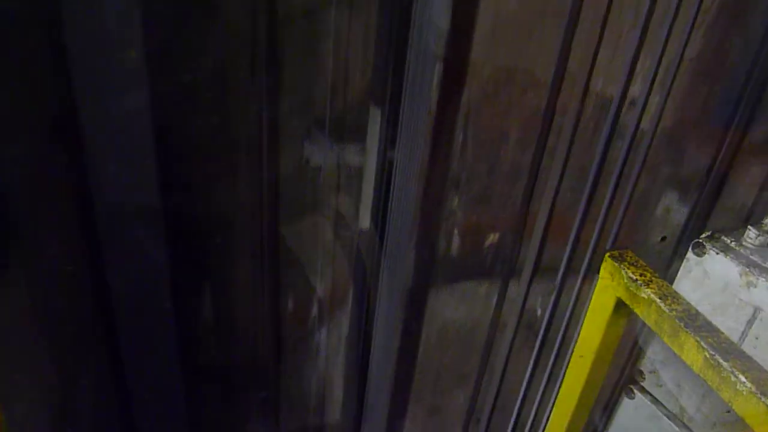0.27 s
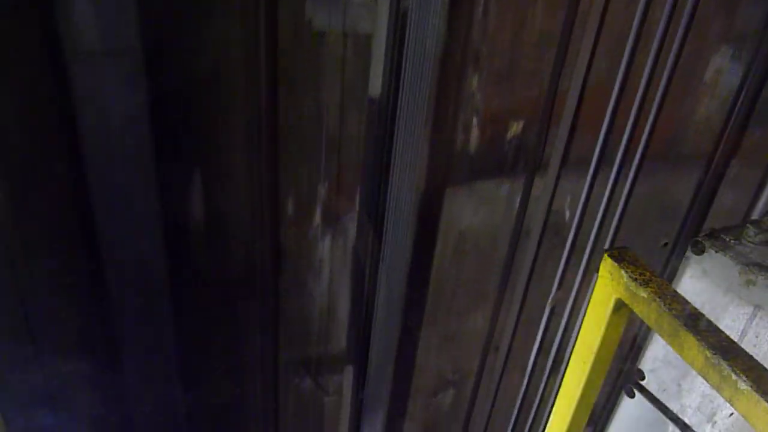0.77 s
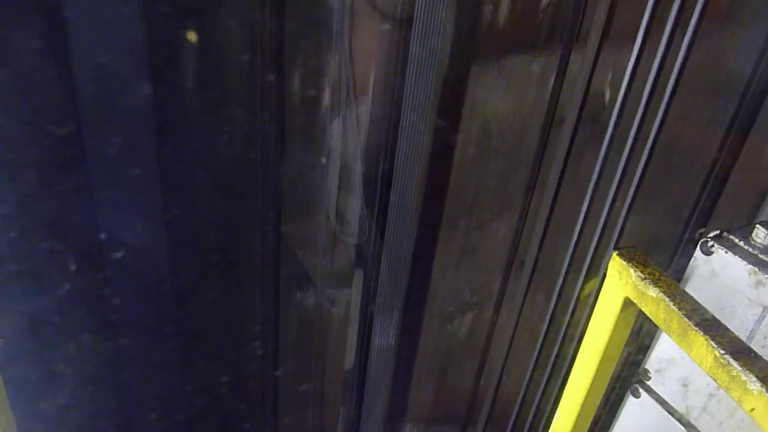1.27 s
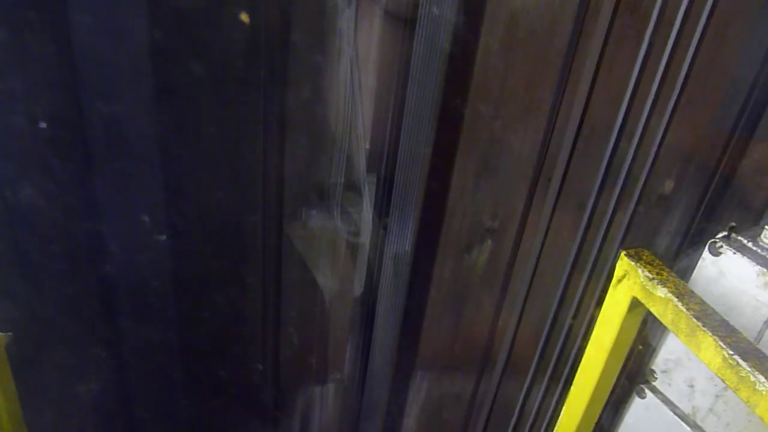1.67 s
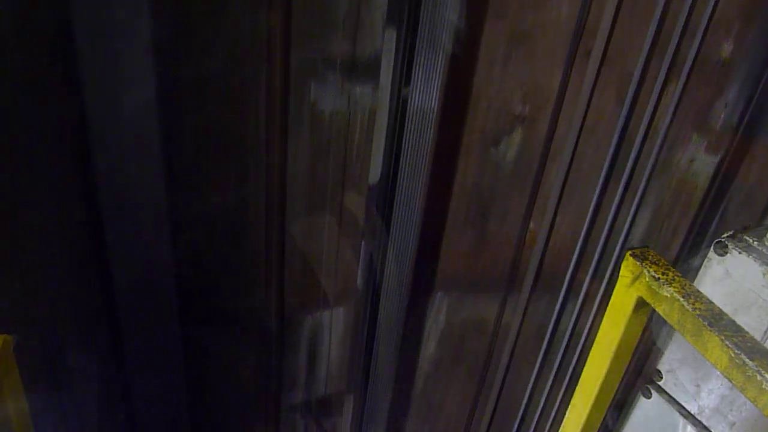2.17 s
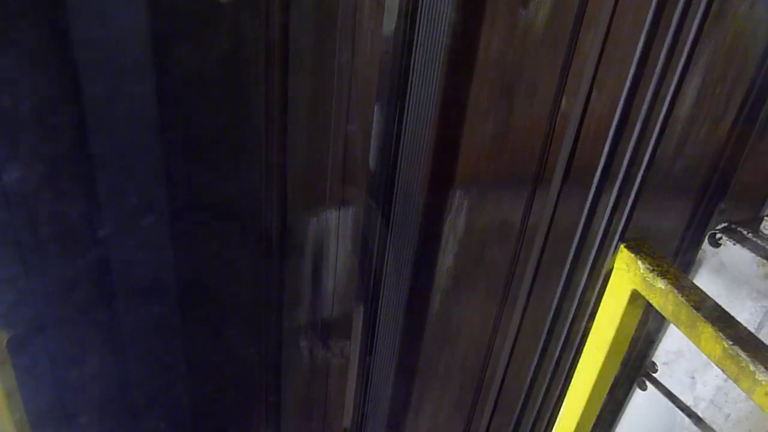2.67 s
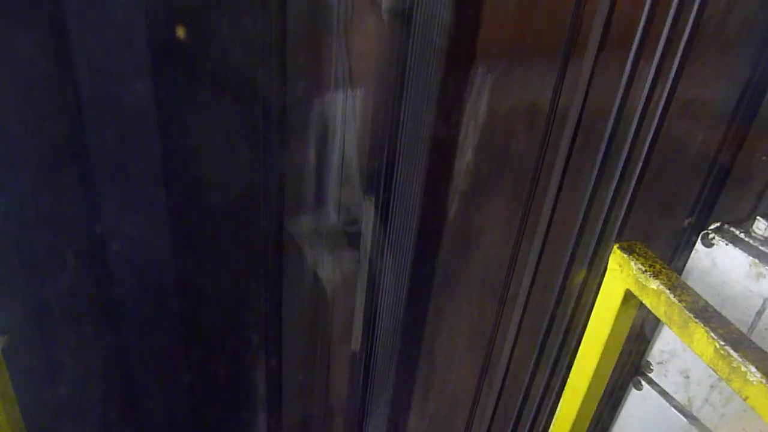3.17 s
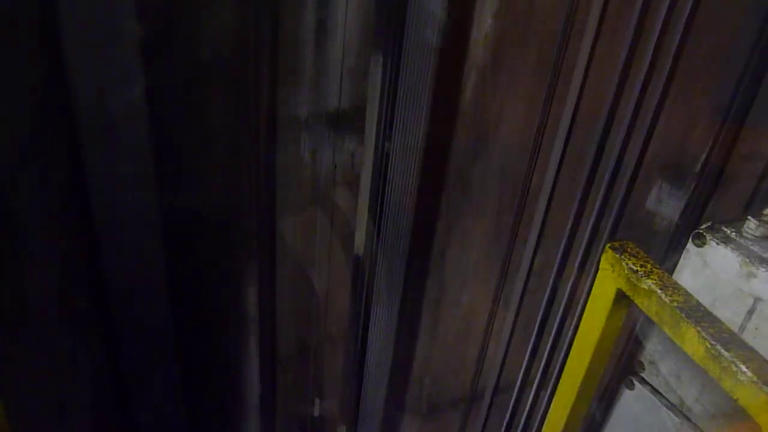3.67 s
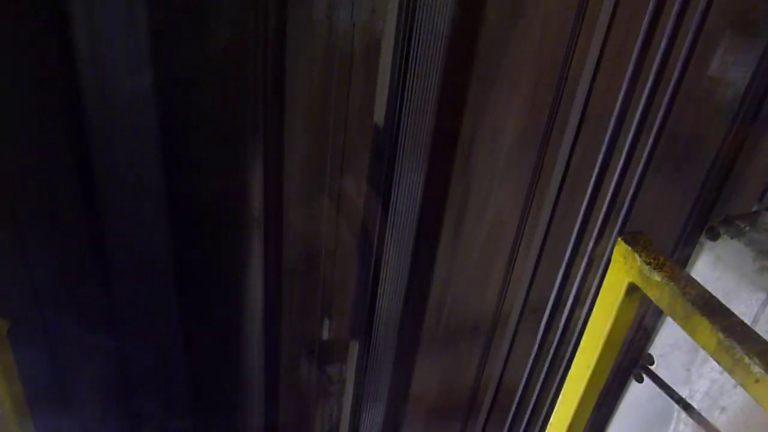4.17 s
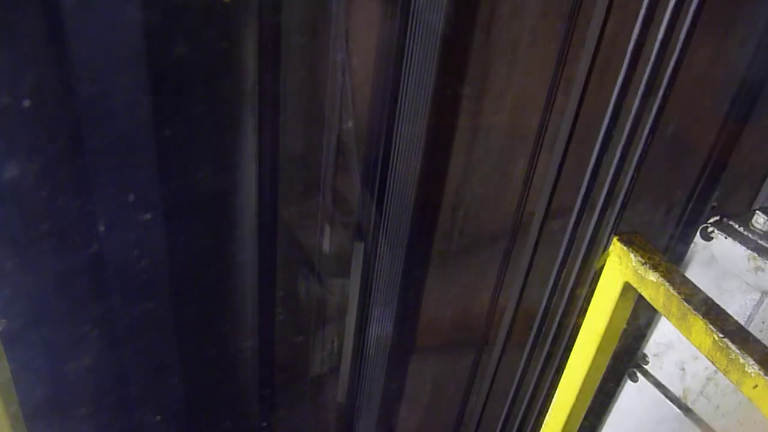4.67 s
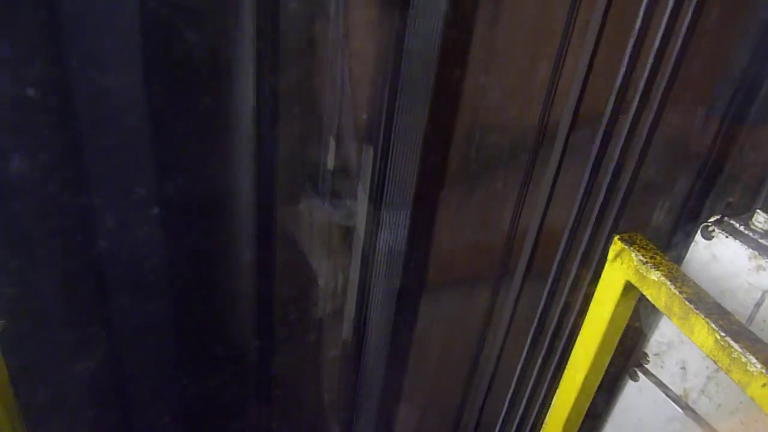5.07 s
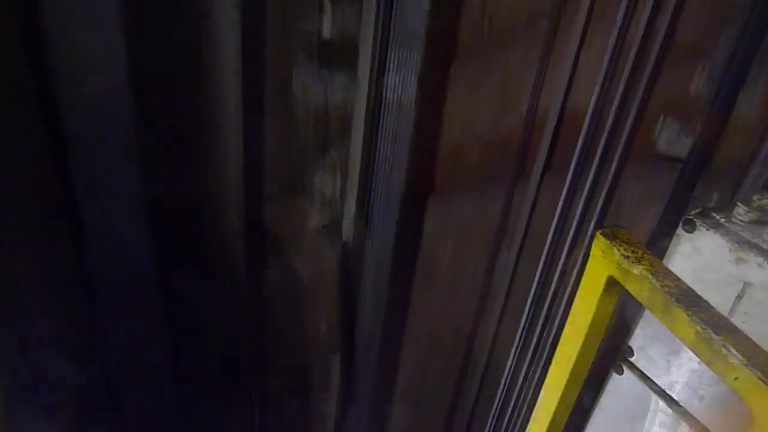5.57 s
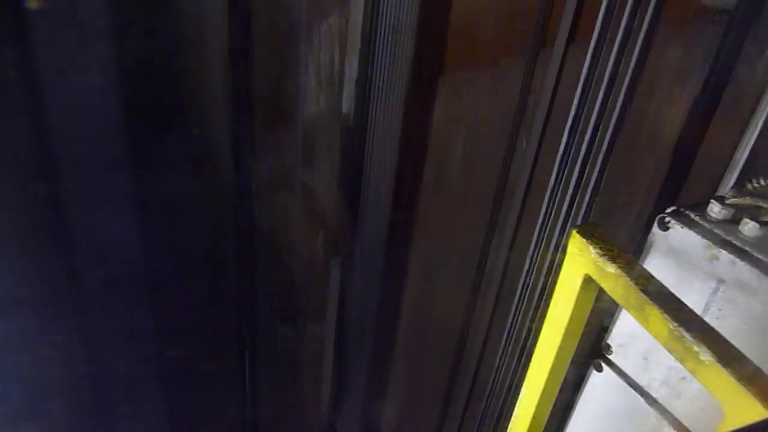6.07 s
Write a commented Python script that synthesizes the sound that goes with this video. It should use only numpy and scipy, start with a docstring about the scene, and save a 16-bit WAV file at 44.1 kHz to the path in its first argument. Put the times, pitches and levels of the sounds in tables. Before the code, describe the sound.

From the roof of a travelling lift car, a broad, hollow roar of guide rollers and ropes runs without a break and grows slightly. The metal frame rings blurrily inside it and the concrete shaft booms underneath. A wavering hum comes and goes, air hisses softly, a faint high whine hovers, and a few tiny rail scuffs pass. Close stereo microphones, dull on top.

```python
"""A broad roar is loudest throughout: guide rollers and ropes rumble around a microphone pair on a lift car's roof.
Its shaking, made as coloured noise, rings the car frame and booms in the cross modes of the concrete duct.
Close by, air hisses past as brighter noise and the motor drive whines as narrow noise bands;
a hum made of two wavering sines rises and sinks, and a few light scuffs of grainy hiss pass by."""
import sys
import numpy as np
from scipy import signal
from scipy.fft import rfft, irfft
from scipy.io import wavfile
from scipy.ndimage import uniform_filter1d, map_coordinates

SR = 44100
rng = np.random.default_rng(int(sys.argv[2]) if len(sys.argv) > 2 else 0)


def dump_mix(stems):
    """Bounce the given channels to the path in sys.argv[1] as a 16-bit WAV at rate SR."""
    frames = np.atleast_2d(stems).T  # one column per channel
    limited = np.clip(frames, -1, 1)  # hard clip at full scale
    pcm = np.round(limited * 32767).astype(np.int16)
    wavfile.write(sys.argv[1], SR, pcm)


N = 279153
T = np.arange(N) / SR  # s
HZ = np.arange(N // 2 + 1) * SR / N  # frequency of each spectrum bin

# Colour tables set relative levels only: field() brings every noise to mid rms 1.
# Colour of the roller and rope roar. Each row: frequency in Hz, relative density in dB per Hz.
RUMBLE_COLOUR = [(30, -70), (45, -56), (65, -46.5), (115, -39.5), (200, -15.5), (315, -15.5), (345, -6),
                 (485, -4.5), (600, -3), (690, -5.5), (810, -3.5), (1120, -12.5), (1800, -27.5),
                 (3000, -42.5), (5000, -84.5)]
# Colour of the passing air. Each row: frequency in Hz, relative density in dB per Hz.
RUSH_COLOUR = [(700, -20), (1500, 10), (2200, 3.5), (2700, 1), (4000, -3.5), (5500, -6.5), (6800, -10),
               (7400, -16), (7800, -30), (7950, -66)]
# Colour of the rail scuffs. Each row: frequency in Hz, relative density in dB per Hz.
SCUFF_COLOUR = [(2500, -20), (4600, -8), (5500, 0), (7300, -2), (7900, -15), (8600, -24)]
# Two close capsules in a diffuse field. Each row: frequency in Hz, side minus mid in dB.
STEREO_WIDTH = [(60, -31.5), (180, -32.5), (310, -34.5), (530, -22.5), (900, -16), (1200, -11.5),
                (1550, -5.5), (2100, -7), (3200, -2), (4600, -1), (7000, -10), (7800, -18.5)]

# Cross modes of the concrete duct. Each row: frequency in Hz, width in Hz, relative level in dB.
DUCT_MODES = [(76, 8.6, -19.5), (125.2, 14, -16), (145.8, 17, -12.5), (224, 18, -2.5), (250.4, 20, -1),
              (288, 25, -2)]
# Rings of the car frame. Each row: frequency in Hz, width in Hz, relative level in dB.
FRAME_MODES = [(350, 16, -3), (383, 12, -3), (420, 20, -5), (449, 22, 0), (594, 12, 5), (618, 20, -2),
               (652, 12, 2), (667, 10, 2), (700, 14, -1), (738, 30, -5), (1330, 30, -13)]
# Broad rings in the middle of the roar. Each row: frequency in Hz, width in Hz, relative level in dB.
DRONE_MODES = [(522, 36, -7), (556, 34, 0)]
# Rings at the upper edge of the roar. Each row: frequency in Hz, width in Hz, relative level in dB.
EDGE_MODES = [(756, 14, -2), (781, 12, 2), (810, 10, 1.5), (832, 14, -1), (862, 16, -3)]
# Strands of the drive's whine. Each row: frequency in Hz, width in Hz, relative level in dB.
WHINE_STRANDS = [(6215, 18, -5), (6245, 30, -6), (6270, 18, -4), (6287, 16, 0), (6312, 16, -2),
                 (6337, 20, -11), (6280, 150, -15)]
# Noisy haze around the hum. Each row: frequency in Hz, width in Hz, relative level in dB.
HUM_HAZE = [(334, 6, 0)]

# Level of the drone along the ride. Each row: time in seconds, level in dB.
DRONE_LEVEL = [(0, -38), (.92, -41), (1.05, -33), (1.35, -33), (1.7, -37), (3.2, -38), (4.0, -36),
               (4.6, -37), (4.8, -32.5), (6.33, -34.5)]
# Level of the upper-edge rings along the ride. Each row: time in seconds, level in dB.
EDGE_LEVEL = [(0, -44.5), (.6, -39.5), (1.3, -42.5), (2.4, -37), (3.4, -39), (3.95, -33.5), (4.4, -46),
              (5.3, -35.5), (6.33, -37)]
# Level of the rush along the ride. Each row: time in seconds, level in dB.
RUSH_LEVEL = [(0, -45), (.85, -46), (1.2, -44), (1.7, -45.5), (5.0, -44), (6.33, -43)]
# Level of the whine along the ride. Each row: time in seconds, level in dB.
WHINE_LEVEL = [(0, -54), (1.2, -51.5), (2.2, -52.5), (3.0, -51.5), (3.7, -53), (4.8, -50.5), (5.6, -53),
               (6.33, -51.5)]
# Level of the hum along the ride. Each row: time in seconds, level in dB.
HUM_LEVEL = [(0, -45), (.22, -45), (.33, -37), (.78, -37), (.96, -50), (1.15, -38), (1.5, -37), (1.76, -45),
             (1.95, -37), (2.3, -47), (2.9, -41), (3.2, -38), (3.75, -41), (4.17, -34), (4.42, -45),
             (5.12, -46), (5.5, -38), (5.85, -46), (6.1, -39), (6.33, -45)]
# Rubs on the guide rail. Each row: start in seconds, level in dB, time in contact in seconds.
SCUFFS = [(0.866, -53.5, .03), (.9, -56, .02), (1.77, -66, .02), (2.19, -63, .035), (6.18, -61, .05)]

# Levels at the start (dB) and their steady growth along the shaft (dB per s)
RUMBLE_DB, RUMBLE_GROWTH_DB_S = -30, 0.5
FRAME_DB, FRAME_GROWTH_DB_S = -35, 0.5
BOOM_DB, BOOM_GROWTH_DB_S = -41.5, 0.05

TRAIL = 2.6  # upper skirt over lower skirt: duct modes and hum haze set in sharply, trail off upwards
WHINE_SIDE_DB = -10  # side against mid
HUM_HZ = 330.5  # lowest pitch
SCUFF_T60_S = 0.089
LEFT_LAG_S, LEFT_DB = 1.5e-5, -.1  # left capsule is later and softer: sound comes slightly from the right
LOW_CUT_HZ, TOP_HZ = 42, 8500


def undb(db):
    """Amplitude factor of a level in dB."""
    return 10 ** (np.asarray(db) / 20)


def swell(points):
    """Gain over time through (s, dB) points."""
    s, db = np.transpose(points)
    return undb(np.interp(T, s, db))


def gain_of_points(points):
    """Gain of (Hz, dB) points joined on a log-frequency axis."""
    hz, db = np.transpose(points)
    return undb(np.interp(np.log(HZ + 1), np.log(hz), db))


def gain_of_modes(modes, order=2, trail=0.95):
    """Gain of resonances driven by unrelated shaking: their powers add."""
    power = 0
    for hz, width, db in modes:
        skirt = np.where(HZ > hz, trail * width, width)
        detune = (HZ - hz) * 2 / skirt
        power = power + undb(2 * db) / (1 + detune ** 2) ** order
    return np.sqrt(power)


def field(gain, side_gain):
    """Left and right noise of a given colour, mid rms 1; the side part is unrelated noise."""
    mid = rfft(rng.standard_normal(N)) * gain
    side = rfft(rng.standard_normal(N)) * gain * side_gain
    lag = np.exp(-2j * np.pi * HZ * LEFT_LAG_S)
    left = irfft((mid + side) * lag, N) * undb(LEFT_DB)
    right = irfft(mid - side, N)
    return np.array([left, right]) / np.std(irfft(mid, N))


def diffuse(gain):
    """Noise of a given colour as the close capsules hear it in a diffuse field."""
    return field(gain, gain_of_points(STEREO_WIDTH))


def walk(rate):
    """Random levels held 1 / rate s and slewed twice; spread near 1."""
    hold = int(SR / rate)
    steps = np.repeat(rng.standard_normal(N // hold + 1), hold)
    slewed = uniform_filter1d(uniform_filter1d(steps, hold), hold)
    return 1.3 * slewed[:N]  # makes up for the spread lost in slewing


def wander(x, drift, rate):
    """Uneven reading speed drifts the pitch up and down; drift is the typical share."""
    speed = 1 + drift * walk(rate)
    place = np.cumsum(speed / speed.mean())
    return np.array([map_coordinates(channel, [place], mode="mirror") for channel in x])


def rumble():
    """Rollers and ropes shake the car: a broad roar, slightly uneven as the rail runs by."""
    flicker_db = 0.5
    return diffuse(gain_of_points(RUMBLE_COLOUR)) * undb(flicker_db * walk(13))


def frame():
    """The shaking rings the car frame; the rings wander and come and go."""
    flicker_db = 1.1
    rings = wander(diffuse(gain_of_modes(FRAME_MODES)), drift=.004, rate=3)
    return rings * undb(flicker_db * walk(3.1))


def booms():
    """The same kind of shaking fills the low cross modes of the duct, heard as resonant noise."""
    return diffuse(gain_of_modes(DUCT_MODES, trail=TRAIL))


def rush():
    """Air squeezed between car and wall hisses: bright noise with a slight flicker."""
    flicker_db = 0.73
    return diffuse(gain_of_points(RUSH_COLOUR)) * undb(flicker_db * walk(15))


def drone():
    """A pair of broad noise resonances in the middle of the roar whose pitch wanders."""
    return wander(diffuse(gain_of_modes(DRONE_MODES)), drift=.01, rate=4)


def edge():
    """Noise resonances at the top of the roar whose pitch wavers a little."""
    return wander(diffuse(gain_of_modes(EDGE_MODES)), drift=.004, rate=3)


def whine():
    """The drive's switching tone is smeared into close noise strands that fade and beat together."""
    return field(gain_of_modes(WHINE_STRANDS), undb(WHINE_SIDE_DB))


def hum():
    """A hum and its octave that waver upwards from a lowest pitch, break up in level and carry a noisy haze."""
    waver_hz, flicker_db = 3.5, 2.1  # typical spreads
    haze_db, octave_db = -5.5, -4  # against the fundamental
    pitch = HUM_HZ + waver_hz * np.abs(walk(9))
    phase = 2 * np.pi * np.cumsum(pitch) / SR
    fundamental = undb(flicker_db * walk(14)) * np.sin(phase)
    octave = undb(octave_db + flicker_db * walk(8.7)) * np.sin(2 * phase)
    tone = np.sqrt(2) * (fundamental + octave)  # a steady fundamental would have rms 1
    haze = undb(haze_db) * diffuse(gain_of_modes(HUM_HAZE, trail=TRAIL))
    return (tone + haze) * swell(HUM_LEVEL)


def scuffs():
    """Short grainy rubs on the guide rail: hiss while in contact, then a quick fade."""
    rise_s, grain_db = .007, 3
    shape = np.zeros(N)
    for start, db, rub in SCUFFS:
        age = np.maximum(T - start, 0)
        rise = 1 - np.exp(-age / rise_s)
        fade = np.exp(-np.log(1000) * np.maximum(age - rub, 0) / SCUFF_T60_S)
        shape += undb(db) * rise * fade
    grain = undb(grain_db * walk(300))
    return shape * grain * diffuse(gain_of_points(SCUFF_COLOUR))


def scene():
    """Roar, frame and duct grow slowly through the ride; rush, drone, edge, whine and hum swell and sink."""
    roar = undb(RUMBLE_DB + RUMBLE_GROWTH_DB_S * T) * rumble()
    roar = roar + undb(FRAME_DB + FRAME_GROWTH_DB_S * T) * frame()
    roar = roar + undb(BOOM_DB + BOOM_GROWTH_DB_S * T) * booms()
    air = swell(RUSH_LEVEL) * rush()
    rings = swell(DRONE_LEVEL) * drone() + swell(EDGE_LEVEL) * edge()
    drive = swell(WHINE_LEVEL) * whine()
    return roar + air + rings + drive + hum() + scuffs()


def record(dry):
    """The microphones lose the deep bass and the recorder cuts the top steeply."""
    low_cut = signal.butter(2, LOW_CUT_HZ, "high", fs=SR, output="sos")
    top_cut = signal.ellip(8, .2, 70, TOP_HZ, fs=SR, output="sos")  # 0.2 dB ripple, 70 dB rejection
    return signal.sosfilt(top_cut, signal.sosfilt(low_cut, dry))


dry = scene()
out = record(dry)
dump_mix(out)
```